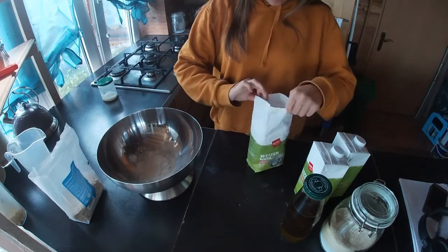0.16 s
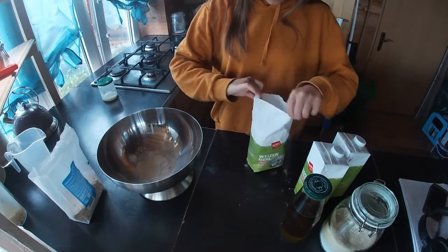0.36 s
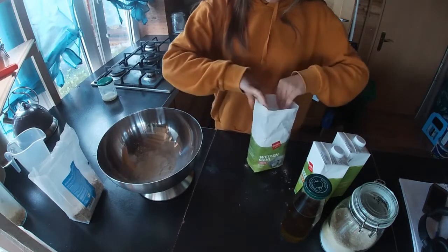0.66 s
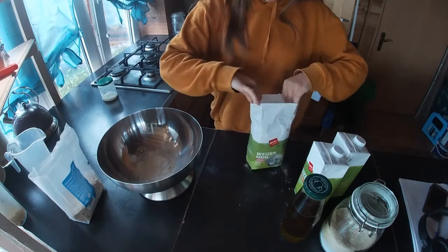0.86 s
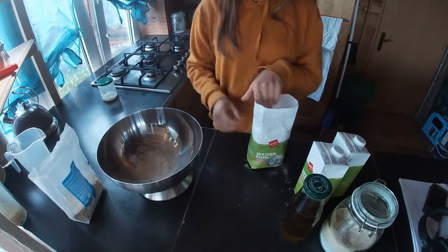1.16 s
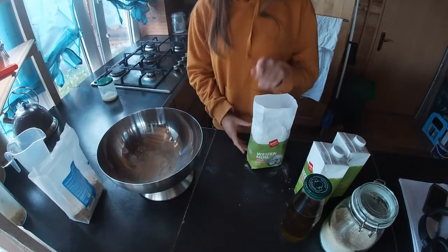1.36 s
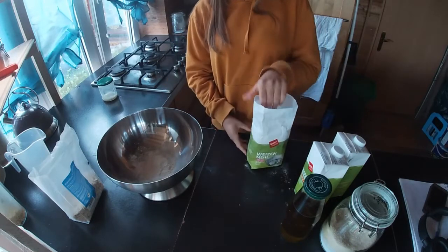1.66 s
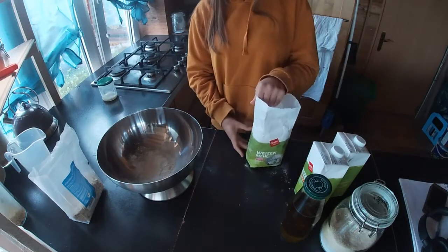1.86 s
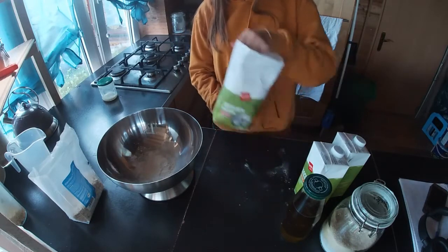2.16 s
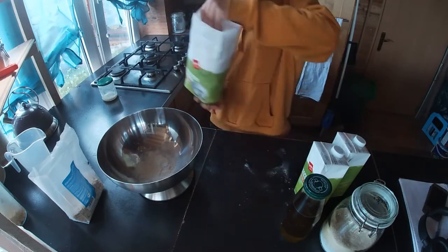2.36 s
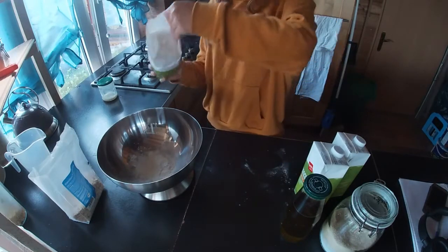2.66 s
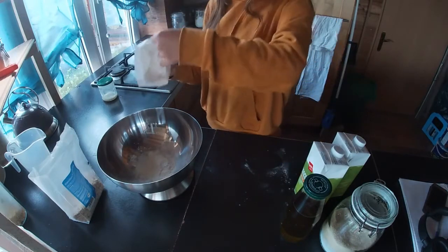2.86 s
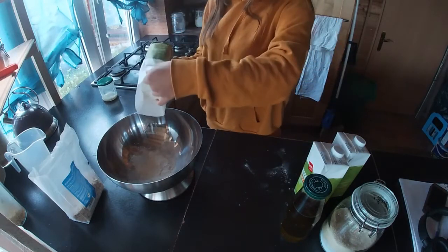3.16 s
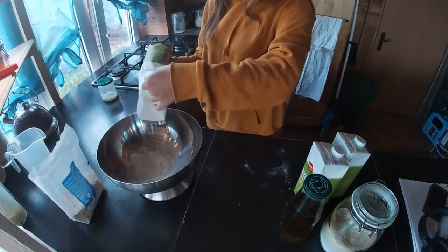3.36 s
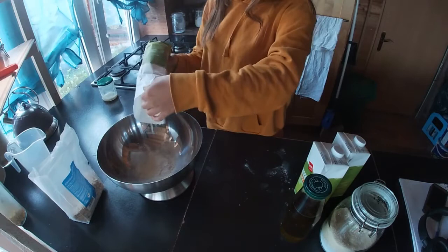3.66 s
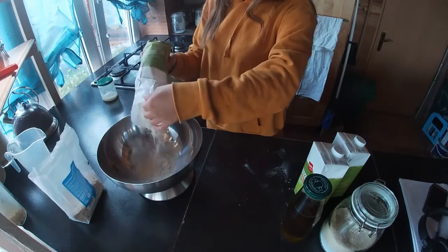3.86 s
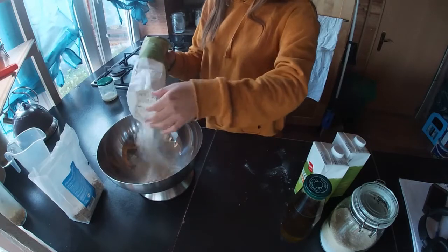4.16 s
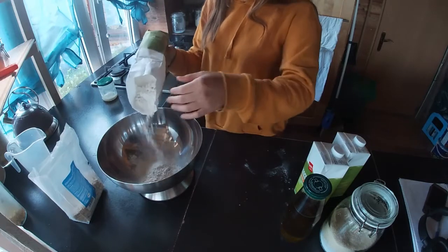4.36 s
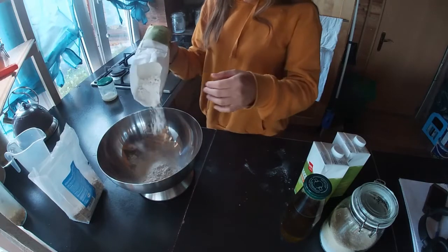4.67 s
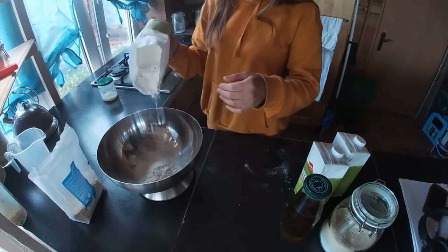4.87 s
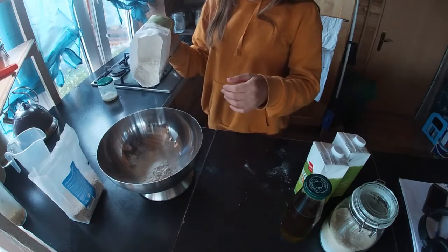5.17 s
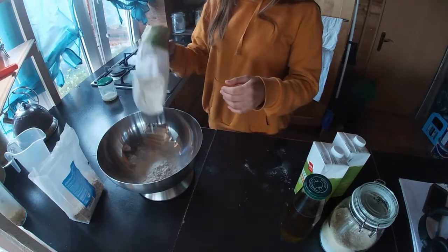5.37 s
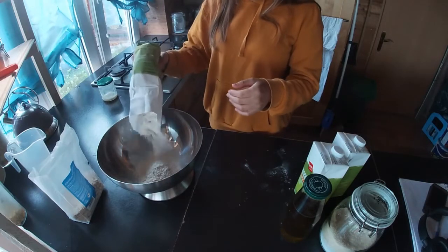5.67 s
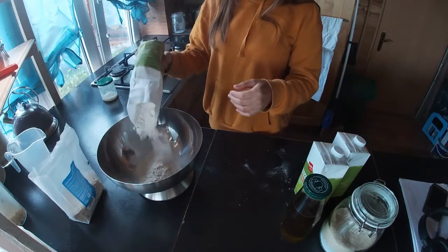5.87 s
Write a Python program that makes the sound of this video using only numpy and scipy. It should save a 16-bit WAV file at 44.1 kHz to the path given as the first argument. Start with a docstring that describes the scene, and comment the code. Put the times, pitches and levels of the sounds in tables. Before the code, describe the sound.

A paper flour bag crinkles sharply as it is opened, then rustles softly as flour is shaken into a bowl.

```python
"""A paper flour bag is unfolded on a kitchen counter, lifted and shaken over a bowl.
Creases buckle with a snap and rubbed paper rustles by stick-slip friction; both drive the resonances
of the air in the bag, and the friction also rings its walls. Flour slides out with thuds and soft ticks.
The kitchen reverberates briefly over a quiet hum. The two channels differ only in the top treble."""
import sys
import numpy as np
from scipy import signal
from scipy.io import wavfile
from scipy.ndimage import uniform_filter1d

SR = 44100
rng = np.random.default_rng(int(sys.argv[2]) if len(sys.argv) > 2 else 0)


def transcribe(signal):
    """Save signal, clipped to [-1, 1], as a 16-bit WAV file at the path in sys.argv[1]."""
    frames = np.atleast_2d(signal).T
    limited = np.clip(frames, -1, 1)
    pcm = np.round(limited * 32767).astype(np.int16)
    wavfile.write(sys.argv[1], SR, pcm)


N = 265041

# Paper snaps and, near the end, soft ticks of falling flour. Each row: start in seconds, strength in dB,
# facet pitch in Hz, weights of the crack and of the bag's air in dB, shudder decay (t60) in seconds.
SNAPS_AND_TICKS = [(0.0445, -15, 3000, 6.5, -22, 0.012), (0.1234, -27, 3270, 1, -26, 0.063),
                   (0.1583, -27.5, 2280, -9, -32, 0.032), (0.198, -8, 1810, -4.5, -13, 0.016),
                   (0.2227, -4, 3470.0, -8.5, -50, 0.01), (0.2456, -25.5, 770, -27, -18, 0.072),
                   (0.268, -14, 3580, -18, -8.5, 0.017), (0.311, -6.5, 3920, -11, -27, 0.0095),
                   (0.3333, -16, 1290, -4, -14, 0.017), (0.3634, -8.5, 2570, -11, -38, 0.017),
                   (0.375, -16, 904, -10, -27, 0.029), (0.391, -20, 920, -15, -4, 0.014),
                   (0.4775, -24, 2600, -9, -8, 0.019), (0.6505, -28.5, 940, -12, -31, 0.15),
                   (0.6618, -26, 1940, -12, -25, 0.082), (0.69, -17, 3900, -20, -34, 0.025),
                   (0.6964, -18.5, 1220, -11, -24, 0.029), (0.703, -17.5, 1320, -9, -30, 0.012),
                   (0.7082, -16, 1130, 2.5, -24.5, 0.0093), (0.7202, -14, 1070, -7, -5, 0.011),
                   (0.7235, -19, 1200, -3, -1, 0.017), (0.7452, -17, 890, -6, -27, 0.022),
                   (0.7633, -16.5, 1080, -6, -16, 0.033), (0.7685, -25, 800, 0, -26, 0.013),
                   (0.7946, -11, 910, -6, -10, 0.0087), (0.815, -35, 1360, -11, -18, 0.022),
                   (0.8242, -15, 1000, -1.5, -11, 0.0067), (0.8457, -10, 2330, -19, -13.5, 0.013),
                   (0.8627, -26, 1360, -14.0, -36, 0.012), (0.8807, -20.5, 900, -43, -31, 0.02),
                   (1.1618, -22.5, 2380, -28, -13, 0.014), (1.2543, -39, 4400, 9.5, -30, 0.039),
                   (1.3265, -18.5, 1030, -9, -18, 0.045), (1.372, -32, 1300, 5.5, -7, 0.045),
                   (1.3864, -32.5, 1310, 0.5, -39, 0.082), (1.7615, -48, 865, 1.5, -11, 0.059),
                   (1.8104, -45, 805, 0, -3.5, 0.22), (1.8659, -16, 1480, -16, -13, 0.024),
                   (1.892, -16, 2680, 0.5, -10.5, 0.019), (1.9184, -11.5, 2030, -6, -19, 0.013),
                   (1.9356, -26, 680, -10, -37, 0.052), (1.9807, -17.5, 2300, -19.5, -12, 0.032),
                   (1.9864, -18.5, 824, -7.5, -16, 0.028), (2.22, -49, 1310, -5, -12, 0.023),
                   (2.3292, -50.5, 750, 1.5, -24.0, 0.034), (2.4109, -43, 1330, -4, -3, 0.02),
                   (2.4557, -36, 1240, 1.5, -12, 0.054), (2.5725, -42.5, 590, -19, -10, 0.042),
                   (2.605, -30, 1370, -15, -16, 0.058), (2.621, -21.5, 2200, -26, -18, 0.014),
                   (2.6623, -32, 2520, 0.5, -12, 0.028), (2.786, -47, 1920, 4.5, -5.5, 0.27),
                   (2.8293, -34.5, 1310, -5, -29, 0.022), (2.904, -27, 1120, -31, -24, 0.024),
                   (2.9468, -42, 1260, 1.5, -36, 0.13), (2.988, -38, 1430, 0.5, -32, 0.074),
                   (3.0471, -26.5, 6150, 1, -26, 0.03), (3.2293, -38.5, 1150, -28, -10.5, 0.035),
                   (3.391, -48.5, 1380, -9, 1, 0.071), (3.425, -40.5, 1190, -9.5, -19.0, 0.038),
                   (3.442, -35, 980, -21, -5, 0.05), (3.4696, -32.5, 1810, -14, -31, 0.03),
                   (3.4843, -23.5, 1200, -6, -8, 0.035), (3.5416, -31.5, 1230, -31, -4.5, 0.039),
                   (3.6332, -31.5, 1290, -11, -14, 0.064), (3.6797, -31.5, 1300, -11.5, -4, 0.042),
                   (3.7304, -38.5, 1300, -22.5, 3.5, 0.051), (3.834, -33.5, 1040, -16, -12, 0.057),
                   (3.806, -35, 1100, -13, -2, 0.033), (3.8306, -22.5, 3100, -11, -18, 0.018),
                   (3.8788, -32, 1380.0, -13, -19, 0.034), (3.8938, -32.5, 960, -18, -21, 0.068),
                   (3.918, -30.5, 875, -21, -10, 0.05), (4.0702, -42.5, 590, -4, -25, 0.08),
                   (4.0885, -35.5, 600, -6.5, -31, 0.054), (4.101, -30.5, 3750, -3, -1.5, 0.015),
                   (4.148, -45, 606, -23, 5, 0.037), (4.199, -52.5, 318, -30, 4.5, 0.046),
                   (5.4672, -49.5, 840.0, -8, -10, 0.043), (5.4835, -58, 710.0, 7, -34, 0.043),
                   (5.5722, -57.5, 600.0, -3, -16.0, 0.082), (5.672, -54.5, 1100, -8, 1, 0.066)]
# Each row: multiple of the facet's pitch, bandwidth as a share of that pitch, gain in dB.
FACET_MODES = [(.55, 0.45, -4.5), (1.01, 0.37, 5), (1.7, 0.84, -8.5)]
def snaps_and_ticks():
    """Impulse excitation: a buckling crease or falling flour sets off a ring, a crack and a puff of air."""
    out, t = np.zeros(N), np.arange(4096) / SR
    crack_response = passed(paper_response(), 3400, "high", order=2)
    air_focus_hz, _ = timbre_drift()
    for start, db, hz, crack_db, air_db, t60 in SNAPS_AND_TICKS:
        facet_noise, crack_noise, air_noise = rng.standard_normal((3, len(t)))
        shudder = gain_of(-60 * t / np.clip(t60, .008, .3)) * (1 - np.exp(-t / 0.00064))
        jolt = 1.6 * np.exp(-t * hz * 6.9) + facet_noise * shudder  # larger facets yield more slowly
        facet = modes(jolt, [(ratio, share * hz, level) for ratio, share, level in FACET_MODES], hz)
        crack = signal.fftconvolve(crack_noise * shudder, crack_response)[:len(t)]
        air = air_puff(t, air_noise * shudder, air_focus_hz[round(start * SR)])
        snap = evened(facet) + gain_of(crack_db) * evened(crack) + gain_of(air_db + 3.5) * evened(air)
        shudder_rms = np.sqrt(np.mean(shudder ** 2))  # a longer shudder carries more energy
        add(out, start, gain_of(db - 6.0) * shudder_rms * snap)
    return out


# Each row: frequency in Hz, spectral density in dB.
PAPER_SPECTRUM = [(880, -29), (1500, 0), (1770, -6), (1910, -2), (2540, -4.5), (2830, -4.5), (3650, -5),
                  (5040, -9.5), (8130, -11), (12900, -31), (15500, -45.5)]
def paper_response(size=2048):
    """Minimum phase: the paper's spectrum as an impulse response with its energy at the front."""
    log_gain = np.log(gain_of(read(PAPER_SPECTRUM, abs(np.fft.fftfreq(size, 1 / SR)))))
    spectrum = np.exp(np.conj(signal.hilbert(log_gain)))
    return np.fft.ifft(spectrum).real[:size // 2]


# Each row: frequency in Hz, bandwidth in Hz, gain in dB.
AIR_MODES = [(181, 52, 7), (246.6, 67, -1), (325.7, 56, 5.5), (426, 81, -0.5), (506.6, 22, 2)]
def air_puff(t, shudder, focus_hz):
    """Cavity resonance: the wall jumps, then shudders, and the enclosed air rings in its modes."""
    push = t / .0004 * np.exp(-t / 0.00045) + .5 * shudder
    air = sum(gain_of(db - 5.0 * np.log2(hz / focus_hz) ** 2) * resonate(push, hz, 1.2 * width)
              for hz, width, db in AIR_MODES)
    return passed(air * (1 - np.exp(-t / 0.0036)), 650, "low", order=2)


# Each row: time in seconds, frequency where the air is driven most in Hz, top-treble gain in dB.
TIMBRE_DRIFT = [(0, 260, -0.5), (.6, 300, -1), (1.0, 301, 1.5), (1.3, 330, -2.5), (1.6, 330, 1),
                (1.9, 400, -9), (2.2, 400, -3), (2.5, 400, 1), (3.0, 320, -1.5), (3.4, 319, -28),
                (3.9, 320, -12), (4.1, 330, -9), (4.3, 330, -4), (6.0, 230, -.5)]
def timbre_drift():
    """Spectral envelope: the favoured air modes shift over time, and the top treble dulls in places."""
    return curves(TIMBRE_DRIFT)


# Each row: frequency in Hz, bandwidth in Hz, gain in dB.
WALL_MODES = [(637, 120, 6.5), (800, 196, -2.5), (945, 190, 4), (1150, 150, -1.5), (1283, 110, 5),
              (1485, 275, -3.5), (1866, 620, -5.5)]
def rustle():
    """Stick-slip friction: tiny slips radiate directly, through the walls and through the bag's air."""
    wall_focus_hz, *gains = stroke_envelopes()
    air_focus_hz, _ = timbre_drift()
    crackle = slips(per_s=250, spread_db=2.0, clump_db=4.0)  # shakes paper and walls at once
    paper = signal.oaconvolve(slips(9000, 1.9, 0.98) + 0.2 * crackle, paper_response())[:N]
    coarse, fine = passed(paper, 3670, "low"), passed(paper, 4880, "high")
    walls = modes(slips(4000, 1.2, 3.5) + 0.76 * crackle, WALL_MODES,
                  focus_hz=wall_focus_hz, falloff_db=6.0)
    air = modes(slips(490, 0.85, 1.4), AIR_MODES, focus_hz=air_focus_hz, falloff_db=6.5)
    layers = coarse, fine, walls, air
    return gain_of(-3.5) * sum(gain * evened(layer) for layer, gain in zip(layers, gains))


def slips(per_s, spread_db, clump_db):
    """Shot noise: impulses of random sign and size, clumped by a wandering gain."""
    size = gain_of(spread_db * np.minimum(rng.exponential(1, N), 4)) * rng.choice([-1., 1.], N)
    clumps = evened(uniform_filter1d(uniform_filter1d(rng.standard_normal(N), size=300), size=300))
    return evened(size * (rng.random(N) < per_s / SR) * gain_of(clump_db * clumps))


# Hands and flour rub the paper. Each row: peak time, swell and hold in seconds, fade in dB per second,
# rustle level in dB, hiss and walls in dB above the rustle, wall focus in Hz, air in dB above the rustle.
RUB_STROKES = [(0.0, .01, .03, 153, -42.5, -2, -6, 1380, -9),
               (0.13, 0.041, .05, 59.5, -45.5, -5.5, 6, 1380, -3),
               (0.32, .3, .05, 107.5, -40.5, -6.5, 6.5, 1100, -2),
               (0.455, 0.11, .02, 164.5, -44.5, 1.5, -9, 900, -31),
               (0.56, 0.033, .08, 100, -63, 8.5, 2.5, 1100, -25),
               (0.657, 0.011, .02, 70, -35, -8, -2, 850, -3.5),
               (0.75, 0.12, .06, 130, -37.5, -4.5, -0.5, 879, -6.5),
               (0.99, .15, .04, 235, -44.5, 4, 2.5, 1156, -10.5),
               (1.25, .06, .04, 101.5, -56, 7.5, 5, 1074, -20),
               (1.38, 0.17, .01, 166, -42, 1.5, -1.5, 1351, -6.5),
               (1.765, 0.0084, .08, 103, -64, 2, -8, 765, -1),
               (1.95, .15, .03, 105.5, -42.5, -6.5, 0.5, 1000, -6.5),
               (2.157, .1, .04, 130, -66.5, 4.5, -2, 1512, -18),
               (2.37, 0.11, .05, 62.5, -64, 3.5, 1, 1445, -3),
               (2.5, 0.088, .01, 141.5, -60, 0, -7.5, 1380, -20),
               (2.636, 0.065, .02, 82, -53.5, -16, 2, 1080, -3.5),
               (2.78, 0.22, .05, 150.5, -55.5, 7, 3, 1250, -13),
               (2.975, 0.11, .14, 109, -50, 3, 0, 1300, -10.5),
               (3.24, 0.28, .02, 154, -70.5, 1, 16.5, 1140, 13.5),
               (3.49, 0.16, .04, 140.5, -57, -1, 2.5, 1000, 5),
               (3.69, 0.14, .04, 248.5, -51.5, -10.5, 0.5, 1320, 6),
               (3.91, .08, .03, 153, -51, -24, 1, 980, 0), (4.06, 0.45, .03, 124, -54.5, 0, 6.5, 1200, -9),
               (4.15, .07, .05, 148.5, -73.5, -22, -2, 855, 21.5),
               (4.55, .15, .02, 65.5, -87.5, -3, -7, 757, 18.5),
               (5.49, .035, .01, 147.5, -70, 6.5, -6, 760, 0),
               (5.62, 0.15, .12, 91.5, -71, 2.5, 2.5, 1004, 5),
               (5.91, 0.26, .03, 118, -68.5, 0, -5.5, 1090, 5), (6.0, .06, .02, 100, -73, -4, 5.5, 750, 12)]
SWELL_DB = 21  # rise over a stroke's swell time
TRICKLE_DB, TRICKLE_HZ = (-83.5, -83, -79, -78), 800  # settling flour: rustle, hiss, walls, air; focus
def stroke_envelopes():
    """Incoherent sources add in power: returns the power-weighted wall focus and four layer gains."""
    t = np.arange(0, N + 64, 64) / SR
    peak, swell, hold, fade, db, hiss_db, walls_db, hz, air_db = np.transpose(RUB_STROKES)[:, :, None]
    rise_db = SWELL_DB * np.maximum(peak - t, 0) / swell
    fall_db = fade * np.maximum(t - peak - hold, 0)
    powers = [gain_of(db - rise_db - fall_db + above) ** 2 for above in (0, hiss_db, walls_db, air_db)]
    trickle = gain_of(TRICKLE_DB) ** 2
    wall_power, wall_floor = powers[2], trickle[2]
    focus_hz = ((wall_power * hz).sum(0) + wall_floor * TRICKLE_HZ) / (wall_power.sum(0) + wall_floor)
    gains = [np.sqrt(power.sum(0) + floor) for power, floor in zip(powers, trickle)]
    return [np.interp(np.arange(N) / SR, t, curve) for curve in [focus_hz, *gains]]


# Each row: time in seconds, level of the sliding flour in dB.
FLOUR_FLOW = [(2.88, -90), (2.92, -55), (2.99, -51.5), (3.06, -56), (3.15, -49.5), (3.22, -61.5),
              (3.3, -65), (3.34, -95)]
# Each row: frequency in Hz, bandwidth in Hz, gain in dB.
CHUTE_MODES = [(1050, 120, -6), (1260, 140, -1.5), (1360, 80, -0.5), (1530, 140, -5.5)]
def flour_slide():
    """Forced resonance: a stream of powder scrapes the hollow chute of the tipped bag."""
    flow_db, = curves(FLOUR_FLOW)
    return gain_of(flow_db) * evened(modes(slips(5500, 1.2, 1.1), CHUTE_MODES))


# Each row: start in seconds, level in dB, pitch in Hz, decay time (t60) in seconds.
THUD_MODES = [(1.161, -33, 1000, 0.03), (1.163, -40.5, 118, 0.16), (1.991, -46.5, 156.4, 0.21),
              (2.606, -31.5, 426, 0.036), (2.621, -31.5, 445, 0.049), (3.246, -54, 164.3, 0.5),
              (3.545, -34.5, 308, 0.047), (3.689, -39, 322, 0.09), (4.149, -47, 322, 0.065),
              (4.536, -57, 507, 0.098), (5.478, -53, 200, 0.17), (5.8, -53, 350, 0.036),
              (5.893, -58, 200, .06)]
def thuds():
    """Damped oscillation: knocks on the counter, pops of air and landing flour ring one mode a row."""
    out, t = np.zeros(N), np.arange(SR // 4) / SR
    soft_onset = 1 - np.exp(-t / 0.0018)
    for start, db, hz, t60 in THUD_MODES:
        add(out, start, gain_of(db - 60 * t / t60) * soft_onset * np.sin(2 * np.pi * hz * t))
    return out


# Each row: frequency in Hz, reverberation time (t60) in seconds.
KITCHEN_DECAY = [(150, 0.13), (500, 0.23), (1500, 0.15), (4000, 0.15), (10000, 0.19)]
def kitchen_reverb(x, gap_s=0.0033):
    """Reverberation: sparse echoes of random sign, each band absorbed at its own rate."""
    echoes = np.zeros(SR // 2)
    slots = np.arange(round(gap_s * SR), len(echoes) - 16, 16)
    echoes[slots + rng.integers(0, 16, len(slots))] = rng.choice([-1., 1.], len(slots))
    hz, t, spectra = signal.stft(echoes, SR, nperseg=128)
    decay = gain_of(-60 * t / read(KITCHEN_DECAY, hz)[:, None])
    tail = signal.istft(spectra * decay, SR, nperseg=128)[1]
    tail[:slots[0]] = 0
    return signal.fftconvolve(x, tail / np.linalg.norm(tail))[:N]


# Each row: frequency in Hz, relative spectral density in dB.
HUM_SPECTRUM = [(12, -29), (20, -2.5), (45, -2.5), (103, -32), (170, -1), (259, -11.5), (281, -11.5),
                (315, -15), (505, -15.5), (881, -5), (1040, -27), (1160, -14.5), (1670, -18), (5840, -21.5),
                (15500, -41.5)]
def room_hum(level_db=-70):
    """Coloured noise: appliances and outdoor sound merge into a spectrum with drifting patches."""
    frames, hz = N // 256 + 5, np.fft.rfftfreq(1024, 1 / SR)
    real, imag, patches = rng.standard_normal((frames, 513, 3)).T
    patches = evened(uniform_filter1d(uniform_filter1d(patches, size=8, axis=0), size=14, axis=1))
    spectra = (real + 1j * imag) * gain_of(read(HUM_SPECTRUM, hz)[:, None] + 1.5 * patches)
    return gain_of(level_db) * evened(signal.istft(spectra, nperseg=1024, noverlap=768)[1][:N])


def modes(x, table, scale=1, focus_hz=None, falloff_db=0):
    """Modal superposition: each mode filters twice for deep valleys; those far from a focus are weaker."""
    out = 0
    for k, (f, width, db) in enumerate(table):
        octaves = 0 if focus_hz is None else np.log2(f / focus_hz)
        ring = resonate(resonate(x, f * scale, width), f * scale, width)
        out = out + (-1) ** k * gain_of(db - falloff_db * octaves ** 2) * ring
    return out


def resonate(x, hz, width):
    """Resonance: one damped mode, with a gain near 1 at its centre."""
    radius = np.exp(-np.pi * width / SR)
    return 2 * signal.lfilter([1 - radius], [1, -radius * np.exp(2j * np.pi * hz / SR)], x).real


def passed(x, hz, kind, order=4):
    return signal.sosfilt(signal.butter(order, hz, kind, fs=SR, output="sos"), x)


def gain_of(db):
    return 10 ** (np.asarray(db) / 20)


def evened(x):
    return x / np.sqrt(np.mean(x ** 2) + 1e-20)


def read(points, hz):
    f, value = np.transpose(points)
    return np.interp(np.log(hz + 1), np.log(f + 1), value)


def curves(table):
    times, *columns = np.transpose(table)
    return [np.interp(np.arange(N) / SR, times, column) for column in columns]


def add(mix, start, sound):
    part = mix[round(start * SR):][:len(sound)]
    part += sound[:len(part)]


def scene():
    """Superposition: the bag, its echoes, the thuds and the hum sum at one point."""
    snaps, rubbing = snaps_and_ticks(), rustle() + flour_slide()
    bag = snaps + rubbing + kitchen_reverb(gain_of(-3.5) * snaps + gain_of(-14.0) * rubbing)
    _, treble_db = timbre_drift()
    treble = signal.sosfiltfilt(signal.butter(2, 10500, "high", fs=SR, output="sos"), bag)
    bag = bag + (gain_of(treble_db) - 1) * treble
    radiated = passed(bag, 180, "high", order=2) + gain_of(-20.5) * bag  # small sources give little bass
    mono = radiated + thuds() + room_hum()
    return np.array([mono, mono])


def record(dry):
    """Comb filtering: delayed top treble joins the channels in opposite polarity, then a band limit."""
    top = np.roll(passed(dry[0], 13440, "high", order=8), 40)
    wide = dry + gain_of(-1) * top * np.array([[1], [-1]])
    low_pass = signal.firwin(511, cutoff=15630, window=("kaiser", 9), fs=SR)
    return signal.oaconvolve(wide, low_pass[None], "same")


dry = scene()
out = record(dry)
transcribe(out)
```